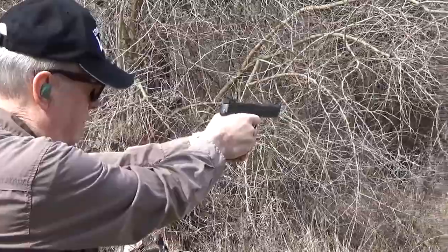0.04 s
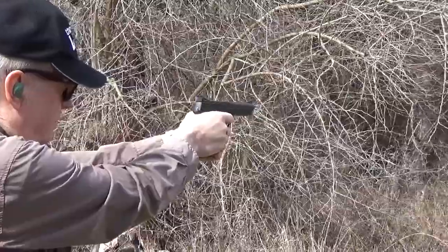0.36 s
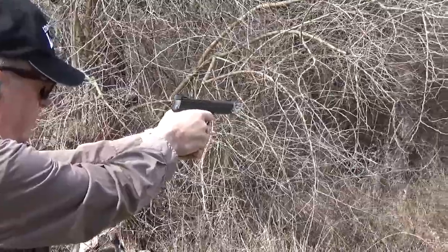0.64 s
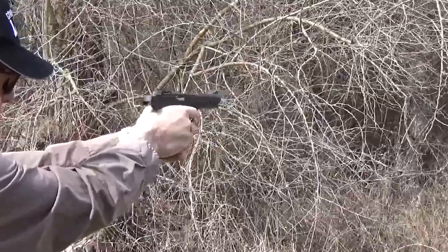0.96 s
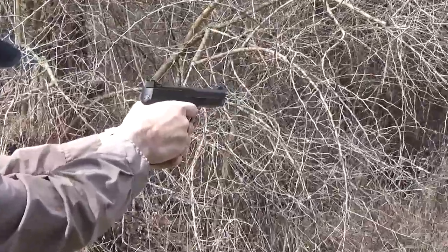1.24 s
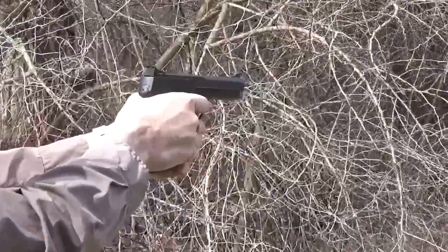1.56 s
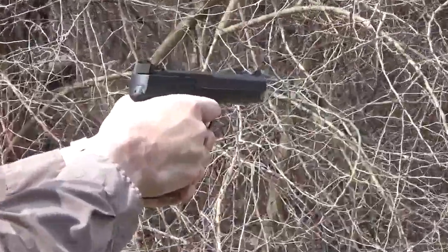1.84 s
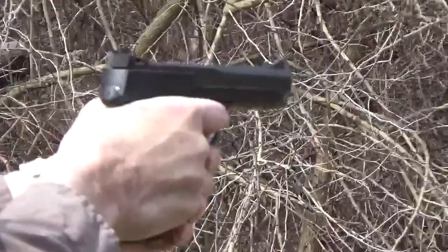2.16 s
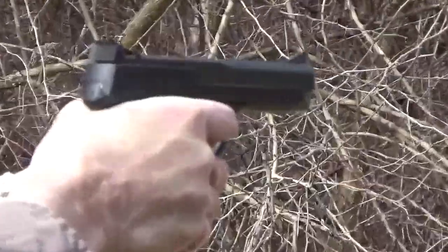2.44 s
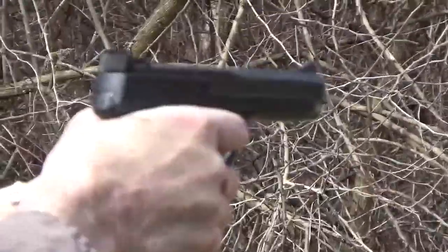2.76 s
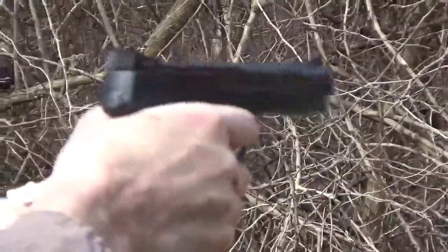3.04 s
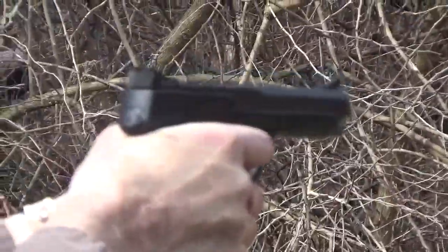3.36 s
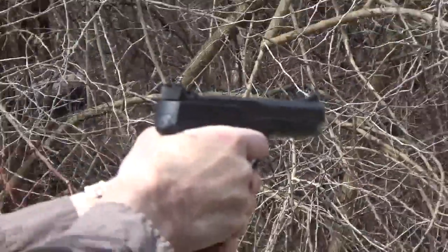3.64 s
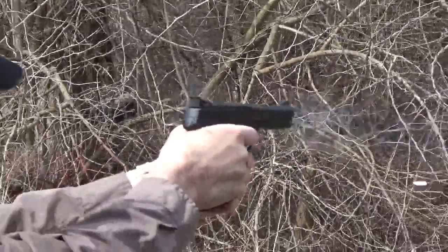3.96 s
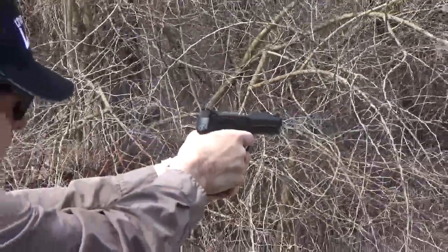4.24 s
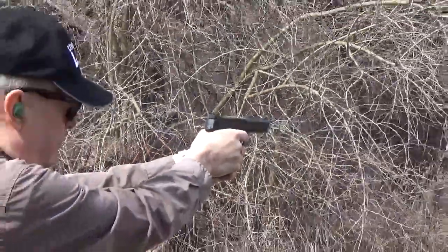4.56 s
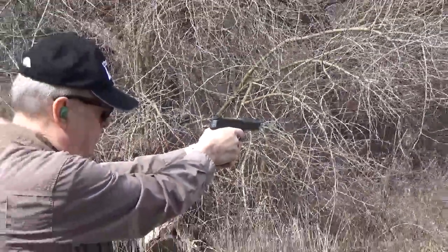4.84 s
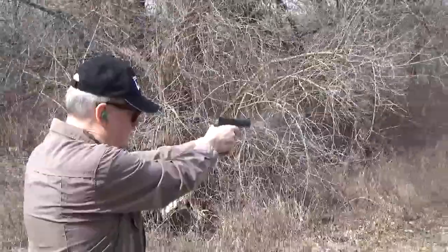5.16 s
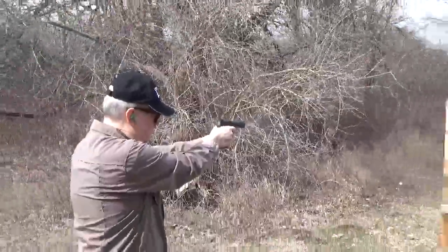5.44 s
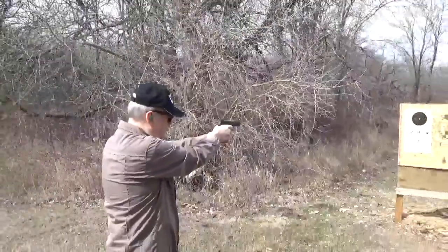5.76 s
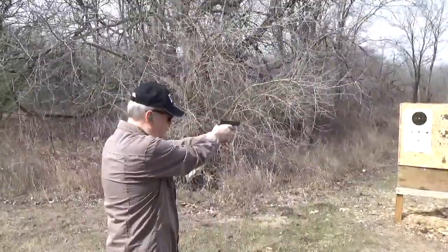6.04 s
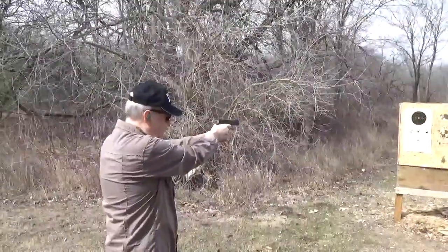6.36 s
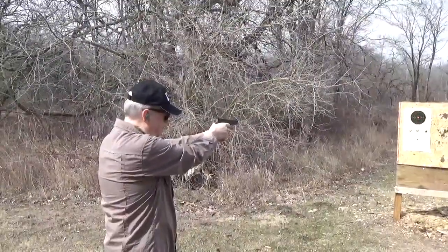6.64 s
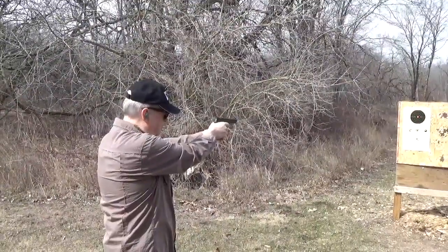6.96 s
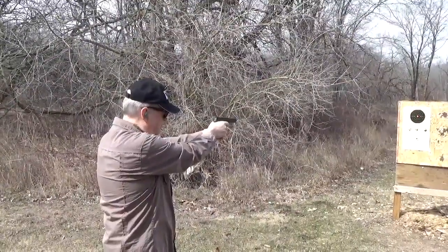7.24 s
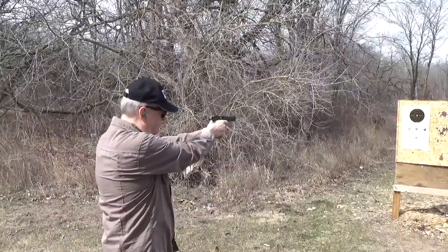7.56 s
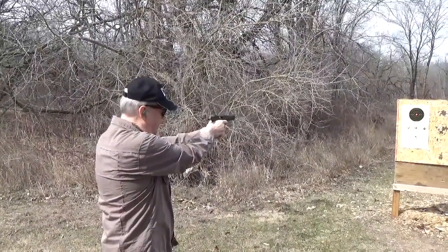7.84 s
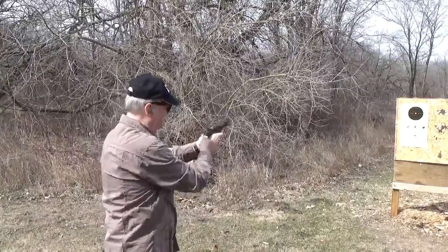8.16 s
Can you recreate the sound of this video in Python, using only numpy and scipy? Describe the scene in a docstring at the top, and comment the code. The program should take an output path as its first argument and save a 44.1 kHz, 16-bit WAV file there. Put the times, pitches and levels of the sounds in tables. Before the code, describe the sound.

Steady pistol shots crack and roll back from nearby trees, over light wind on the microphone and faint distant frogs.

```python
"""Edge of a bare wood: a pistol shot's echo dies away over a low country murmur and far, shrill frogs.
Wind bumps the microphone, mostly in the first 3 s. From 1 s on, the small pistol fires about once a
second, a few metres off. Each crack returns from the same trunks and twigs as a long, darkening roar,
pressed flat at first by the limiter. From about 2.8 s on, spent cases tick on the ground between shots."""
import sys
import numpy as np
from scipy import signal
from scipy.fft import rfft, irfft, next_fast_len
from scipy.io import wavfile
from scipy.ndimage import uniform_filter1d, minimum_filter1d

SR = 44100
rng = np.random.default_rng(int(sys.argv[2]) if len(sys.argv) > 2 else 0)


def dump_mix(stems):
    """Bounce the given channels to the path in sys.argv[1] as a 16-bit WAV at rate SR."""
    frames = np.atleast_2d(stems).T  # one column per channel
    limited = np.clip(frames, -1, 1)  # hard clip at full scale
    pcm = np.round(limited * 32767).astype(np.int16)
    wavfile.write(sys.argv[1], SR, pcm)


N = 366471
TIME = np.arange(N) / SR

# Table levels are relative.
# stereo width, near sounds: f/Hz, side minus mid/dB
NEAR_SIDE_DB = [(60, -17), (300, -16), (1100, -17), (2200, -16), (3600, -13), (6500, -10.5), (11000, -12)]
# stereo width, far sounds: f/Hz, side minus mid/dB
FAR_SIDE_DB = [(60, -24), (1100, -26), (3200, -20), (6500, -11), (11000, -11)]
# country murmur: f/Hz, level/dB
MURMUR_SPECTRUM = [(25, -19), (60, -11), (110, -3), (190, -1.5), (280, -2.5), (430, -5.5), (750, -5),
                   (1300, -8.5), (2000, -17), (2500, -21), (3000, -15), (4300, -33.5), (7000, -37),
                   (11000, -40)]
# frog chorus: t/s, level/dB
FROG_LEVELS = [(1.8, -52.5), (2.8, -56.5), (4.9, -55.5), (6, -52.5), (8.3, -54)]
# wind rumble: f/Hz, level/dB
WIND_SPECTRUM = [(25, -32), (55, -13), (90, -4), (130, -2), (190, -4), (260, -11.5), (400, -22.5),
                 (900, -39), (2000, -72), (4000, -110)]
# breeze at the microphone: t/s, level/dB
BREEZE_LEVELS = [(0, -34), (.45, -37.5), (.9, -28), (1.15, -33), (1.7, -26.5), (2, -43.5), (2.7, -37),
                 (3.2, -48.5), (7.3, -58.5), (7.8, -43), (8.3, -36)]
# eddies striking the housing: t/s, level/dB
EDDY_HITS = [(.205, -22), (.35, -23.5), (.528, -21.5), (.585, -27), (.665, -18.5), (.82, -15.5), (.9, -18),
             (.968, -13.5), (1.285, -21.5), (1.658, -22), (2.48, -26), (2.68, -28), (2.89, -32.5),
             (7.935, -31)]
# spent cases landing and bouncing: t/s, level/dB, f/Hz, ring/s
CASE_HITS = [(2.751, -26, 4200, 0.0046), (3.7162, -22.5, 2700, .006), (3.8014, -22.5, 2990, .004),
             (4.7058, -40.5, 5600, .008), (5.661, -31.5, 5000, 0.0033), (5.759, -33, 3300, 0.0017),
             (6.6155, -25, 3000, .004), (6.6516, -23, 3400, 0.0026), (7.922, -31, 8100, 0.012)]
# slaps from trunks and tree lines: delay/s, spread/s, level over scatter/dB
THICK_TRUNKS = [(0.0158, 0.0013, 8.5), (0.031, 0.0066, 6.5), (.052, 0.0097, 2.5), (0.08, 0.013, 1),
                (0.106, 0.0086, 3.5), (.128, 0.001, 11), (0.163, 0.0052, 1.5), (0.213, 0.0029, 6),
                (.227, .003, 9.5), (0.292, 0.0031, 5), (.325, 0.0098, 5.5), (.412, 0.0021, 0),
                (0.471, 0.011, -3), (.523, 0.0027, 6)]
# echo of the wood: f/Hz, initial level/dB, decay/(dB/s)
ECHO_SPECTRUM = [(39.8, -46, 19.5), (102, -27, 34.5), (166, -9, 11), (235, -14, 57), (263.4, -1, 54),
                 (422, -2.5, 58), (609, 0, 31.5), (1337, -0.5, 38), (2320, -7.5, 54), (2710, -5, 56.5),
                 (5000, -11.5, 78), (6950, -9, 102.5), (11600, -9.5, 140.5)]
# pitches the echo favours: f/Hz, width/Hz, gain/dB
ECHO_BANDS = [(326, 11, 4), (506, 17, 4), (705, 8, -1.5), (786, 11, 1.5), (995, 12, -0.5), (1145, 12, 4.5),
              (1514, 15, 2.5)]
# direct crack: f/Hz, level/dB
CRACK_SPECTRUM = [(100, -3.5), (400, 7), (1000, -13.5), (1800, 6.5), (2600, 1), (3800, -1), (6000, -7.5),
                  (10500, 2), (13000, -16.5)]
# shots: t/s, echo level/dB, crack drive/dB, crack width/s, thump level/dB
PISTOL_SHOTS = [(-.2183, 2, 0, .0012, 0), (0.9878, 0.5, 9, 0.00044, 15), (1.9227, -1, -5.5, 0.0013, -12),
                (2.9851, -2, 17.5, 0.00057, 2), (3.927, -1.5, 1, 0.0011, -2),
                (5.0301, -1.5, 4, 0.00068, 9.5), (6.114, -1, 6.5, 0.00054, 11),
                (7.3154, -1, 0.5, 0.00072, -9)]


def undb(db):
    """Decibels to gain."""
    return 10 ** (np.asarray(db) / 20)


def unit_rms(x):
    """Scale to rms 1."""
    return x / np.sqrt(np.mean(x ** 2))


def at_hz(points, hz, column=1):
    """Interpolate a table column over log frequency."""
    table = np.array(points, float)
    return np.interp(np.log(hz + 1), np.log(table[:, 0]), table[:, column])


def colour(x, points):
    """Filter by a curve of (f/Hz, gain/dB) points."""
    size = next_fast_len(x.shape[-1])
    gain = undb(at_hz(points, np.fft.rfftfreq(size, 1 / SR)))
    return irfft(rfft(x, size) * gain, size)[..., :x.shape[-1]]


def stereo_noise(size, side_db=0, width=NEAR_SIDE_DB):
    """Noise at two close capsules: alike in the bass, wider in the treble."""
    mid, side = rng.standard_normal((2, size))
    side = undb(side_db) * colour(side, width)
    return np.array([mid + side, mid - side])


def drift(rate_hz):
    """Smooth random curve, rms 1."""
    hold = int(SR / rate_hz)
    steps = np.repeat(rng.standard_normal(N // hold + 1), hold)
    return unit_rms(uniform_filter1d(uniform_filter1d(steps, hold), hold)[:N])


def bell(x, centre, sigma):
    """Gaussian of height 1."""
    return np.exp(-.5 * ((x - centre) / sigma) ** 2)


def add(out, sound, start_s):
    """Mix sound into out at start_s."""
    offset = int(round(start_s * SR))
    first, end = max(offset, 0), min(offset + sound.shape[-1], N)
    if end > first:
        out[:, first:end] += sound[..., first - offset:end - offset]


def murmur(level_db=-38.0, swell_db=2.0, swell_hz=2.077, hiss_hz=2000):
    """Far roads swell slowly under a steady thin hiss."""
    air = unit_rms(colour(stereo_noise(N, width=FAR_SIDE_DB), MURMUR_SPECTRUM))
    roads = colour(air, [(hiss_hz / 2, 0), (hiss_hz, -20), (hiss_hz * 2, -60)])
    swell = undb(swell_db * drift(swell_hz))
    return undb(level_db) * (air + roads * (swell - 1))


def leaves(level_db=-67.5, spread_db=20, ring_s=.005, count=80):
    """Dry leaves and twigs tick faintly at random."""
    out, t = np.zeros((2, N)), TIME[:SR // 20]
    for position, strength in rng.uniform(0, 1, (count, 2)):
        tick = stereo_noise(len(t)) * np.exp(-t / ring_s)
        add(out, undb(spread_db * strength) * tick, position * N / SR)
    return undb(level_db) * unit_rms(colour(out, [(1500, -15), (5000, -3), (9500, 0.5)]))


def frogs(pitch_hz=3270, range_hz=230, rise=0.0484, peep_s=0.11, smear_s=0.11, count=1400):
    """Far rising peeps, blurred by the wood into one shrill band."""
    peeps, progress = np.zeros((2, N)), np.linspace(0, 1, int(peep_s * SR))
    starts_s = rng.uniform(-peep_s, N / SR, count)
    for start_s, (detune, loudness) in zip(starts_s, rng.uniform(-1, 1, (count, 2))):
        hz = (pitch_hz + range_hz * detune) * (1 + rise * (progress - .5))
        envelope = undb(2 * loudness) * np.sin(np.pi * progress)
        add(peeps, envelope * np.sin(2 * np.pi * np.cumsum(hz) / SR), start_s)
    blur = stereo_noise(SR // 2, width=FAR_SIDE_DB) * np.exp(-TIME[:SR // 2] / smear_s)
    chorus = unit_rms(signal.fftconvolve(peeps, blur, axes=1)[:, :N])
    return undb(np.interp(TIME, *np.transpose(FROG_LEVELS))) * chorus


def wind(gain_db=-0.5, flutter_db=2.0, flutter_hz=22, attack_s=0.011, release_s=.017):
    """Breeze flutters on the microphone housing; strong eddies swell fast and die away."""
    breeze = undb(np.interp(TIME, *np.transpose(BREEZE_LEVELS)) + flutter_db * drift(flutter_hz))
    eddies = sum(undb(db) * bell(TIME, peak_s, np.where(TIME < peak_s, attack_s, release_s))
                 for peak_s, db in EDDY_HITS)
    rumble = unit_rms(colour(stereo_noise(N, side_db=-1), WIND_SPECTRUM))
    return undb(gain_db) * np.hypot(breeze, eddies) * rumble


def spent_cases(gain_db=-8, contact_s=.0008, settle_db=-19, settle_s=0.0425, size=8192):
    """Light brass on hard ground: sharp contact, dry rattle, short settling rustle."""
    out, t = np.zeros((2, N)), TIME[:size]
    for start_s, db, hz, ring_s in CASE_HITS:
        tick = unit_rms(colour(stereo_noise(size), [(hz / 8, -12), (hz / 3, 0), (hz, 0), (hz * 3, -7)]))
        envelope = np.exp(-t / contact_s) + np.exp(-t / ring_s) + undb(settle_db) * np.exp(-t / settle_s)
        add(out, undb(db + gain_db) * tick * envelope, start_s)
    return out


def trunk_slaps(t, thin_db=-3, thin_spread_s=0.0057, reach_s=.9, count=24):
    """Echo gain over delay: a few thick trunks among thin, randomly placed ones."""
    thick_power = sum(undb(db) ** 2 * bell(t, delay_s, spread_s) for delay_s, spread_s, db in THICK_TRUNKS)
    delays_s = reach_s * ((np.arange(count) + rng.uniform(0, 1, count)) / count) ** 2
    thin_power = undb(thin_db) ** 2 * sum(bell(t, delay_s, thin_spread_s) for delay_s in delays_s)
    return np.sqrt(1 + thick_power + thin_power)


def wood_echo(scatter, slaps, twig_hz=2600, trunk_db=-2.5, build_s=0.0068, size=2048):
    """Blast scattered by the wood; air and soft ground absorb treble and low mids along the path."""
    hz, delay_s, frames = signal.stft(scatter, SR, nperseg=size)
    peaks_db = sum(db * bell(hz, centre_hz, width_hz) for centre_hz, width_hz, db in ECHO_BANDS)
    start_db = at_hz(ECHO_SPECTRUM, hz) + peaks_db
    decay_db_per_s = at_hz(ECHO_SPECTRUM, hz, column=2)
    gain = undb(start_db[:, None] - decay_db_per_s[:, None] * delay_s)
    roar = signal.istft(frames * gain, SR, nperseg=size)[1]
    # twigs return the treble evenly, trunks the mids in separate slaps
    trunks = colour(roar, [(twig_hz / 2, 0), (twig_hz, -4), (twig_hz * 2, -16)])
    twigs = roar - trunks
    onset = 1 - np.exp(-TIME[:roar.shape[1]] / build_s)
    return (twigs + undb(trunk_db) * trunks * slaps) * onset


def muzzle_blast(crack_db, width_s, thump_db, lead_s, push_db=-9, push_s=0.001, prelude_db=-17, size=4096):
    """Faint tick in a soft, brief hiss; then, lead_s in, crack of escaping gas, low push and suction."""
    t = TIME[:size] - lead_s
    noise = unit_rms(colour(stereo_noise(size), CRACK_SPECTRUM))
    tick = noise * bell(t, -.004, .0003)
    hiss = .35 * noise * bell(t, -.003, .003)
    gas = noise * undb(crack_db) * bell(t, .0012, width_s)
    crack = .68 * np.tanh(1.4 * gas)  # capsule overload: a dense snap
    age = np.maximum(t, 0) / push_s
    pressure = (t > 0) * (1 - age) * np.exp(-age)
    thump = signal.sosfilt(signal.butter(2, [75, 300], "band", fs=SR, output="sos"), pressure)
    return crack + undb(prelude_db) * (tick + hiss) + undb(thump_db + push_db) * thump


def pistol(echo_db=4, fresh_share=0.24, side_db=-1.0, narrow_db_per_s=11, lead_s=.01, size=65536):
    """Blasts and narrowing echoes; the same trees repeat each echo, moving air changes a share of it."""
    out, t = np.zeros((2, N)), TIME[:size]
    width_db = side_db - narrow_db_per_s * t
    trees = stereo_noise(size, width_db)
    slaps = trunk_slaps(t)
    for start_s, db, crack_db, width_s, thump_db in PISTOL_SHOTS:
        scatter = np.sqrt(1 - fresh_share) * trees + np.sqrt(fresh_share) * stereo_noise(size, width_db)
        add(out, undb(db + echo_db) * wood_echo(scatter, slaps), start_s)
        add(out, muzzle_blast(crack_db, width_s, thump_db, lead_s), start_s - lead_s)
    return out


def scene():
    """Shots and cases in front, wind at the microphone, country behind."""
    return pistol() + spent_cases() + wind() + frogs() + murmur() + leaves()


def record(dry, threshold_db=0, release_db_per_s=160, clip_level=.8, top_hz=10900, window=64):
    """Limiter ducks at peaks and recovers steadily; then soft clip and low-pass."""
    over_db = np.maximum(20 * np.log10(np.abs(dry).max(axis=0) + 1e-9) - threshold_db, 0)
    recovery_db = release_db_per_s * TIME
    duck_db = recovery_db - np.maximum.accumulate(over_db + recovery_db)
    limited = dry * undb(uniform_filter1d(minimum_filter1d(duck_db, window), window))
    rounded = limited / (1 + (limited / clip_level) ** 4) ** .25
    return signal.sosfiltfilt(signal.ellip(8, .1, 45, top_hz, fs=SR, output="sos"), rounded)


dry = scene()
out = record(dry)
dump_mix(out)
```